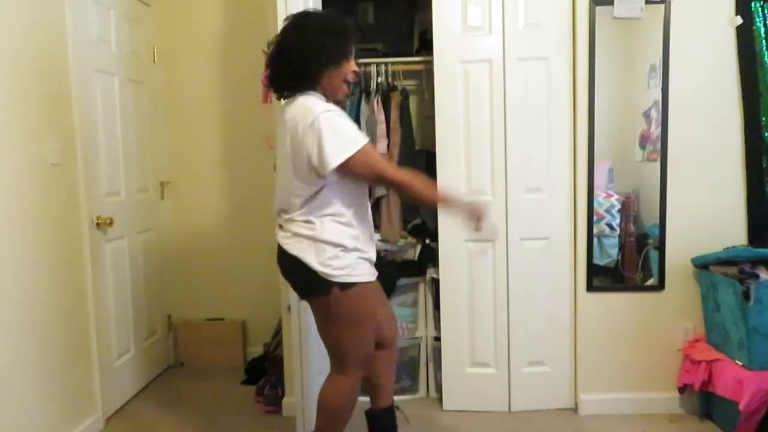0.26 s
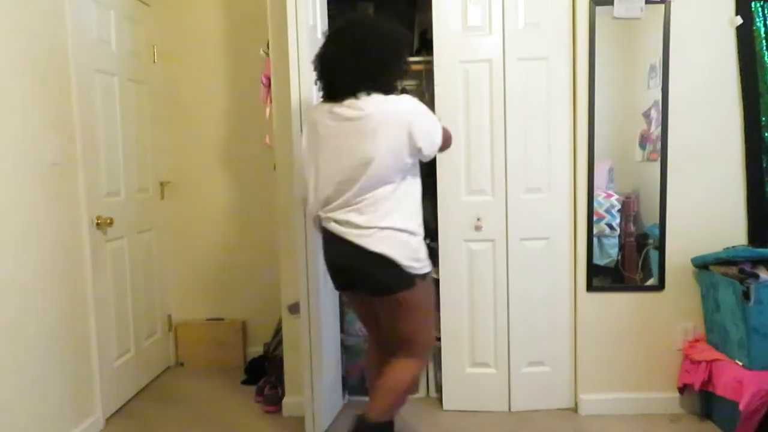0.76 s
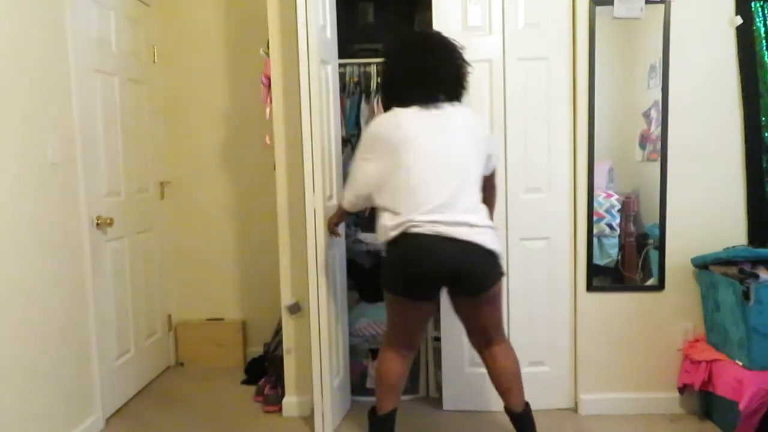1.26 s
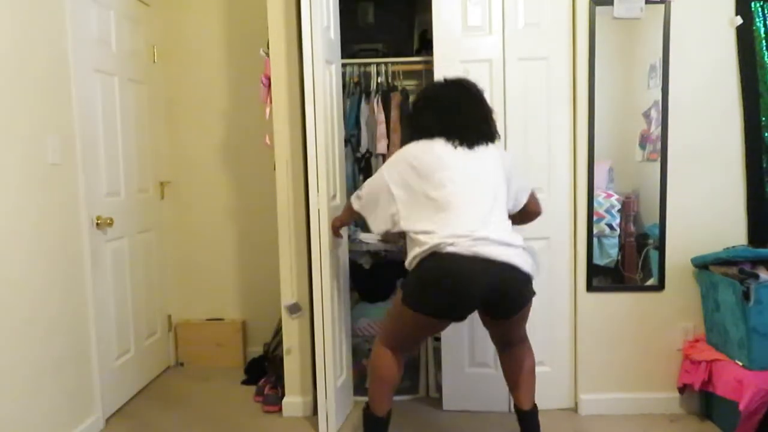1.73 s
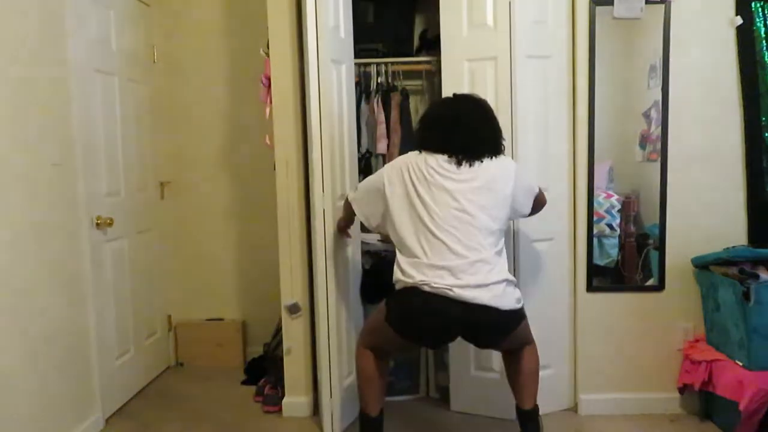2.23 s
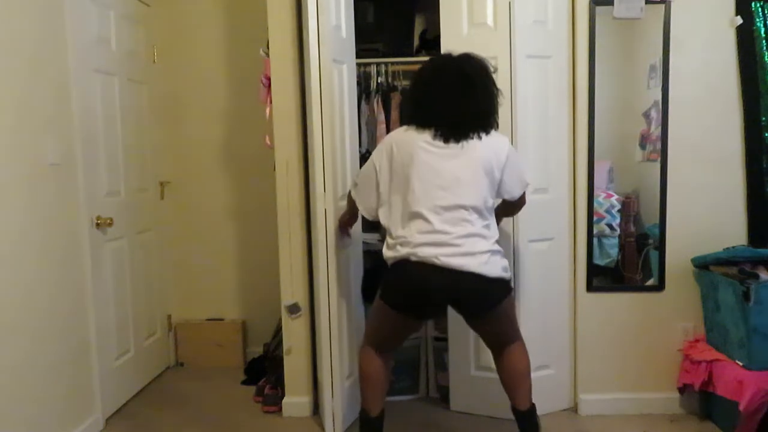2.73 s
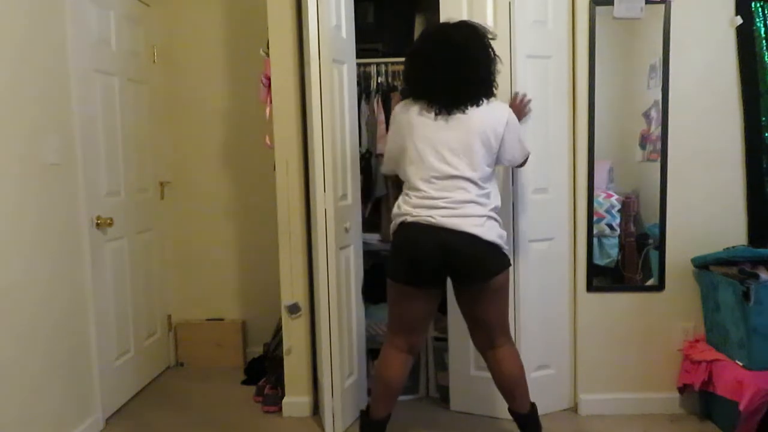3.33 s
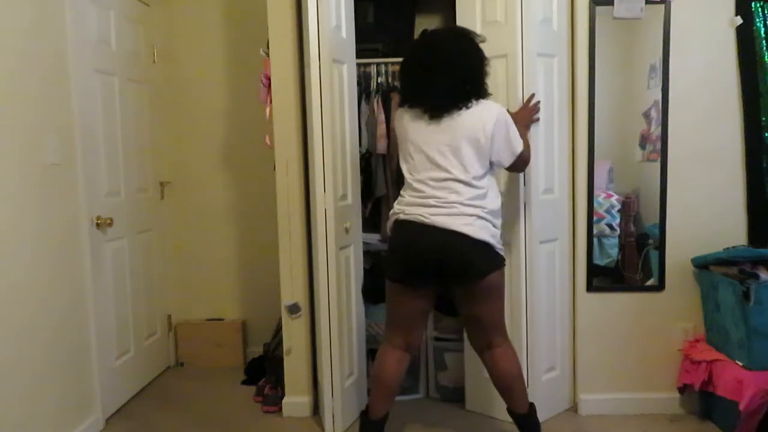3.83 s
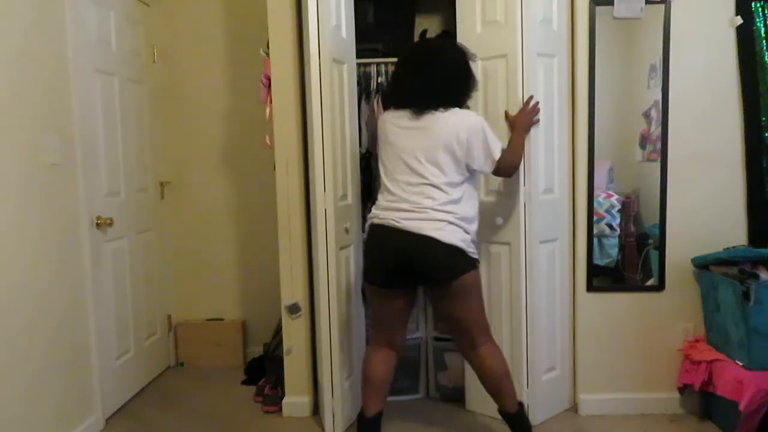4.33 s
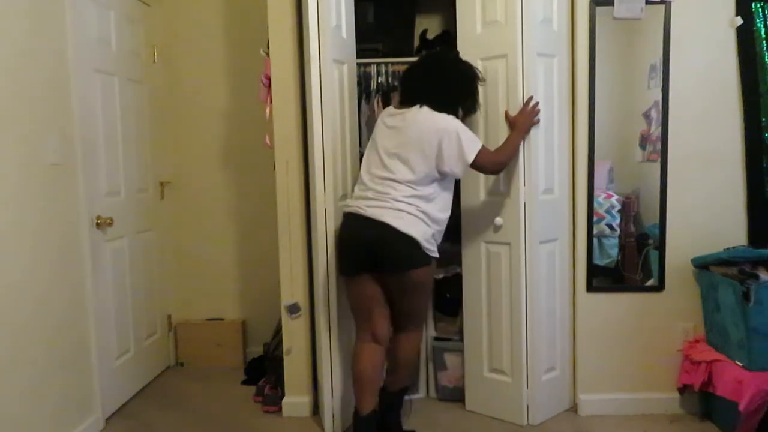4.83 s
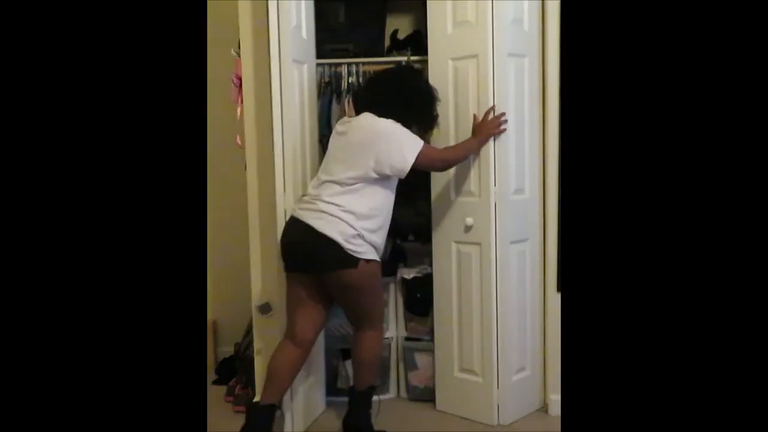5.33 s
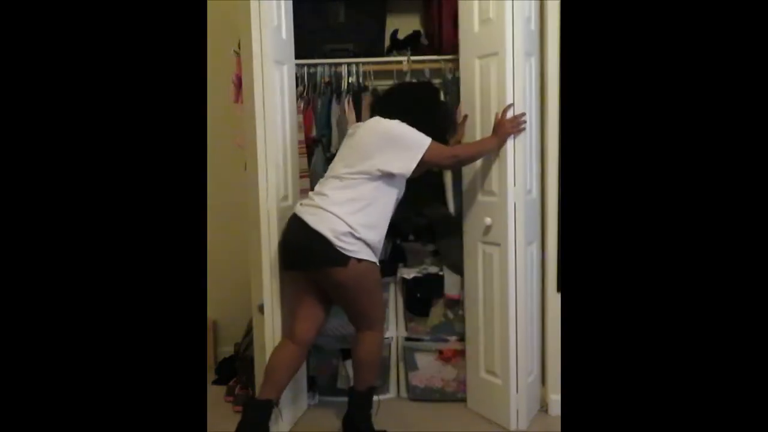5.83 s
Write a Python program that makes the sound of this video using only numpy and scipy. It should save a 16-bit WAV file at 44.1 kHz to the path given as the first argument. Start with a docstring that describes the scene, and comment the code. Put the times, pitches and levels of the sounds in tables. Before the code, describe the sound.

Close, nearly centred sound of light hollow door panels: a single bright crack, a burst of boxy knocks around two seconds, muffled bumping, a rattle near four seconds, small scrapes and faint squeaks, then a loud booming clatter just before six seconds that ends in a creaking drag. Short indoor echo over very faint air.

```python
"""In a carpeted bedroom, hollow folding closet doors are pulled and pushed open.
Knocks and rubs are noisy forces that drive decaying modes of panel, crack and hinge metal; the drag of the guide
pin drives the same modes with clumped slips. Squeaks are gliding narrow noise, thumps are swelling sines, and
the shudder is narrow noise at the two lowest modes. Sparse decaying echoes make the room, over faint steady air."""
import sys
import numpy as np
from scipy import signal
from scipy.fft import rfft, irfft, next_fast_len
from scipy.io import wavfile
from scipy.ndimage import uniform_filter1d

SR = 44100
rng = np.random.default_rng(int(sys.argv[2]) if len(sys.argv) > 2 else 0)


def generate_wav(signal):
    """Clip the signal to [-1, 1] and save it as 16-bit WAV at the path in sys.argv[1]."""
    frames = np.transpose(np.atleast_2d(signal))
    scaled = np.clip(frames, -1, 1) * 32767
    pcm = np.round(scaled).astype(np.int16)
    wavfile.write(sys.argv[1], SR, pcm)


N = 268124

# Modes of the hollow panel. Each row: nominal frequency in Hz, level in dB, t60 in seconds.
PANEL = [(164.5, 0.5, 0.13), (209.3, 1, 0.098), (266, 0, 0.19), (319.8, -4, 0.28), (347.7, -4.5, 0.22),
         (432.4, 3, 0.043), (510, -3.5, 0.1), (551.6, -0.5, 0.12), (694, -8, 0.062)]
# Modes heard as the crack of a blow. Each row: nominal frequency in Hz, level in dB, t60 in seconds.
CRACK = [(800, 4.5, 0.0077), (1132.5, -1, 0.083), (1184, 2, 0.0056), (1625, 0, 0.018), (1706, -3, 0.029),
         (1819, -3, 0.036), (2013, -1.5, 0.0096), (2307, -0.5, 0.027), (2536, 2.5, 0.0049),
         (3340, -1, 0.0099), (3448, -2, 0.014), (3930, -2, 0.0016)]
# Modes of the hinge metal. Each row: nominal frequency in Hz, level in dB, t60 in seconds.
TICK = [(3720, 10, 0.0012), (4614, 5, 0.013), (5300, 2, 0.0058), (6200, -0.5, .02), (7420, -1, 0.0012),
        (9800, -4, 0.001), (12300, -15, 0.0011)]
FAMILIES = PANEL, CRACK, TICK


def gain_of(db):
    """Level: converts decibels to an amplitude factor."""
    return 10 ** (np.asarray(db) / 20)


def evened(x):
    """Normalisation: scales a signal to rms 1."""
    return x / np.sqrt(np.mean(x ** 2) + 1e-20)


def read(points, hz):
    """Spectral interpolation: reads a table on a log-frequency axis."""
    f, value = np.transpose(points)
    return np.interp(np.log(hz + 1), np.log(f + 1), value)


def curve(rows, column):
    """Envelope: turns one dB column of a time table into a gain per sample."""
    rows = np.asarray(rows)
    return gain_of(np.interp(np.arange(N) / SR, rows[:, 0], rows[:, column]))


def coloured(x, points):
    """Linear filtering: weights the spectrum by a table of Hz and dB."""
    size = next_fast_len(N)
    weights = gain_of(read(points, np.fft.rfftfreq(size, 1 / SR)))
    return irfft(rfft(x, size) * weights, size)[..., :N]


def ring(x, modes, shift=1):
    """Modal synthesis: a force excites decaying sines whose summed response has unit energy."""
    t = np.arange(SR // 4) / SR
    body = np.zeros(len(t))
    for k, (hz, db, t60) in enumerate(modes):
        decay = gain_of(db - 60 * t / max(t60, .0008))
        body += (-1) ** k * decay * np.sin(2 * np.pi * hz * shift * t) / np.sqrt(t60)
    return signal.oaconvolve(x, body / np.linalg.norm(body))[:N]


def favour(x, hz, width, rest):
    """Point excitation: a resonance at hz (number or curve) stands out; the rest passes at gain rest."""
    turn = np.exp(2j * np.pi * np.cumsum(hz * np.ones(len(x))) / SR)
    r = np.exp(-np.pi * width / SR)
    # Shift hz down to zero, low-pass, shift back up.
    band = (turn * signal.lfilter([1 - r], [1, -r], x / turn)).real
    return evened(evened(band) + rest * x)


def wooden(x):
    """Contact compliance: wood against wood pushes little above the crack modes."""
    return signal.lfilter(*signal.butter(2, 4500, fs=SR), x)


def contacts(events, shape, focus_hz, rest):
    """Contact excitation: a noisy force of the given shape in time drives three families of modes."""
    detune = .02  # the fold of the door shifts all modes by about this share from contact to contact
    bounce_db, bounce_s = 2.5, .006  # depth and length of the chatter after the first touch
    tick_top_hz, tick_db_per_octave = 12050, 3.5  # top of a tick at -30 dB; softer ticks are duller
    t = np.arange(SR // 3) / SR  # the longest force
    out = np.zeros(N + SR)
    grit = rng.standard_normal((len(events), 4, len(t)))
    shifts = 1 + detune * rng.standard_normal(len(events))
    for event, (low, mid, high, jolt), shift in zip(events, grit, shifts):
        s, db, panel_db, tick_db, length, panel_hz, hz = event
        octaves = (db + tick_db + 30) / tick_db_per_octave
        top_hz = np.clip(tick_top_hz * 2 ** octaves, 5500, 18000)
        high = evened(signal.lfilter(*signal.butter(2, top_hz, fs=SR), high))
        chatter = evened(uniform_filter1d(jolt, round(bounce_s * SR)))
        bounces = evened(gain_of(bounce_db * np.minimum(t / (5 * bounce_s), 1) * chatter))
        panel_noise = favour(low, panel_hz, 0.2 * focus_hz, rest)
        crack_noise = favour(wooden(mid), hz, focus_hz, rest)
        noise = np.array([panel_noise, crack_noise, high])
        levels = gain_of(db + np.array([[panel_db], [0], [tick_db]]))
        forces = levels * shape(t, max(length, .01)) * noise * bounces
        sound = sum(ring(force, modes, shift) for force, modes in zip(forces, FAMILIES))
        out[round(s * SR):][:len(sound)] += sound
    return out[:N]


def hush():
    """Stationary noise: faint steady air of the room, one noise for mid and one for side."""
    # Spectrum of the quiet room. Each row: frequency in Hz, relative level in dB per Hz.
    air_spectrum = [(88, -20.5), (150, -4), (216, -16), (257, -23.5), (312, -28), (1980, -16.5),
                    (5950, -26.5), (15000, -40)]
    return gain_of(-78) * evened(coloured(rng.standard_normal((2, N)), air_spectrum))


def drag():
    """Stick-slip friction: clumped slips of pin and hinges over a smooth rub ring the knocks' modes."""
    # The moving door. Each row: time in seconds, panel rumble in dB, scrape along the track in dB.
    motion = [(0.0, -44.5, -71), (0.29, -44.5, -63), (0.46, -55, -65.5), (1.25, -74.5, -78),
              (1.39, -39.5, -49), (1.78, -61, -62.5), (1.95, -23, -55.5), (2.08, -34.5, -54),
              (2.45, -51.5, -60.5), (2.62, -61.5, -80), (3.0, -68, -81), (3.59, -78, -89.5),
              (3.79, -44.5, -59.5), (3.82, -46, -56.5), (3.91, -25.5, -39.5), (4.13, -80.5, -70.5),
              (4.42, -69, -60.5), (4.54, -58, -57.5), (4.72, -77, -75), (4.98, -75.5, -71.5),
              (5.16, -44.5, -56.5), (5.36, -52.5, -57), (5.53, -31.5, -43), (5.64, -46.5, -48),
              (5.69, -28.5, -34), (5.88, -28.5, -45.5), (5.94, -35.5, -43), (6.03, -42, -36.5),
              (6.08, -41, -36)]
    slips_per_s, spread_db, smooth = 1000, 2.4, 0.6
    clump_db, clump_s, wander = 2.4, .018, .12  # wander: spread of the roaming log-frequency
    scrape_base_hz, scrape_hz_per_db = 1707, 58  # the centre rises as the scrape gains on the rumble
    # Hiss relative to the scrape at hard_db when scrape equals rumble; it grows faster than the scrape.
    hiss_db, hiss_slope, hard_db, hiss_per_db = -13.5, 1.4, -51.5, 0.48

    sizes = gain_of(spread_db * np.minimum(rng.exponential(1, N), 5))
    slips = sizes * (rng.random(N) < slips_per_s / SR)
    rub = smooth * np.array([[1], [2], [6]]) * rng.standard_normal((3, N))
    low, mid, high = evened(slips * rng.choice([-1, 1], N)) + rub

    span = round(clump_s * SR)
    *slow, roam = (evened(uniform_filter1d(uniform_filter1d(row, span), span))
                   for row in rng.standard_normal((5, N)))
    # One shared fluctuation and one of its own for each family of modes.
    clumps = [evened(gain_of(clump_db * evened(slow[0] + own))) for own in slow[1:]]

    rumble, scrape = curve(motion, 1), curve(motion, 2)
    hard = gain_of(hard_db)
    hiss = hard * gain_of(hiss_db) * (scrape / hard) ** hiss_slope * (scrape / rumble) ** hiss_per_db
    centre_hz = scrape_base_hz + scrape_hz_per_db * 20 * np.log10(scrape / rumble)
    scrape_hz = np.clip(centre_hz, 1000, 2600) * np.exp(wander * roam)
    forces = rumble * evened(low), scrape * favour(mid, scrape_hz, 670, 0.97), hiss * evened(high)
    return sum(ring(force * clump, modes) for force, clump, modes in zip(forces, clumps, FAMILIES))


def shudder():
    """Sustained resonance: the hands keep the door's two lowest modes going, as narrow noise around each."""
    # Level of the flex mode. Each row: time in seconds, level in dB.
    flex_level = [(0.0, -55), (0.96, -67.5), (1.73, -52.5), (2.01, -29), (2.23, -42), (2.66, -55.5),
                  (3.23, -60.5), (3.61, -43), (3.76, -39.5), (4.03, -35.5), (4.33, -44), (4.72, -57),
                  (5.08, -61.5), (5.32, -41), (5.88, -37.5), (6.08, -29.5)]
    # Shoves that set the whole door swaying. Each row: time of the peak in seconds, level in dB.
    shoves = [(.37, -46), (.56, -46.5), (1.97, -35.5), (2.099, -31.5), (2.25, -40.5), (3.94, -27.5),
              (4.202, -41), (5.27, -44), (5.45, -40), (5.69, -19.5), (5.86, -27.5), (6.0, -41)]
    rise_db_s, fall_db_s, rest_db = 250, 151.5, -63
    sway_hz, sway_width_hz = 50, 24
    flex_hz, flex_width_hz = 108, 30
    out, t = np.zeros(N), np.arange(N) / SR
    sway = gain_of(rest_db) * np.ones(N)
    for s, db in shoves:
        sway += gain_of(db - np.maximum(rise_db_s * (s - t), fall_db_s * (t - s)))
    modes = (sway, sway_hz, sway_width_hz), (curve(flex_level, 1), flex_hz, flex_width_hz)
    for level, hz, width in modes:
        r = np.exp(-np.pi * width / SR)
        wander = signal.lfilter([1], np.convolve([1, -r], [1, -r]), rng.standard_normal((2, N)))
        z = wander[0] + 1j * wander[1]
        z = z / (abs(z) + 0.034 * np.std(z))  # a steady push evens out the swing
        out += level * evened((z * np.exp(2j * np.pi * hz * t)).real)
    return out


def thumps():
    """Transient flexure: soft thumps of a panel against its stop are low sines that swell and die."""
    # Each row: start in seconds, peak level in dB, frequency in Hz.
    blows = [(0.064, -40, 110.4), (0.499, -38.5, 122), (0.917, -45, 123), (1.792, -28, 134),
             (1.931, -28, 135), (1.999, -24.5, 132), (2.102, -23.5, 132), (2.291, -40.5, 161),
             (2.429, -32.5, 112), (2.84, -35, 115.4), (3.068, -47.5, 107.8), (3.238, -37.5, 103.2),
             (3.317, -43, 107.3), (3.374, -41, 99), (3.448, -41.5, 95), (3.594, -30.5, 115.7),
             (3.64, -29.5, 100), (3.83, -32.5, 104.5), (4.021, -28, 108.4), (4.165, -34, 105.5),
             (4.552, -40, 104.4), (5.1, -35, 119), (5.191, -31.5, 115.3), (5.657, -15, 141.7),
             (5.732, -16.5, 120.4), (5.793, -14.5, 123)]
    thump_s = 0.051  # the swell peaks after a third of this
    out, u = np.zeros(N + SR), np.arange(0, 3, 1 / (thump_s * SR))
    for s, db, hz in blows:
        swell = 3 * u * np.exp(1 - 3 * u)
        swing = swell * np.sin(2 * np.pi * (hz * u * thump_s + rng.random()))
        out[round(s * SR):][:len(u)] += gain_of(db) * swing
    return out[:N]


def rubs():
    """Sliding contact: hand or edge on a panel gives a catch, a held stroke that eases off, a quick release."""
    # Each row: start in seconds, scrape in dB, panel and tick in dB against the scrape,
    # length in seconds (at least 0.01 is used), centre of the panel force in Hz, centre of the scrape in Hz.
    strokes = [(0.108, -64, 19, -32, 0.014, 510, 980), (0.695, -53, 12.5, -27, 0.14, 512, 1050),
               (0.718, -37, 1, -27, 0.11, 498, 1420), (1.519, -29.5, -7, -32, 0.042, 275, 1080),
               (2.59, -40, 8, -56, 0.11, 421, 1353), (2.7, -35.5, -1, -43.5, 0.063, 375, 1055),
               (3.56, -48, -0.5, -40, 0.057, 420, 2000), (3.745, -45, -2.5, -29, 0.27, 479, 2710),
               (4.433, -44, 9.5, -35, 0.036, 596, 1190), (4.506, -47, -5, -11, 0.18, 464, 2190),
               (4.868, -49, -20, -24, 0.09, 517, 1940), (4.987, -47.5, 2.5, -32, 0.11, 462, 1970),
               (5.105, -47.5, -11, -19, 0.043, 443, 910), (5.285, -45.5, 15.5, -17, 0.01, 430, 980),
               (5.337, -39, -6, -45, 0.054, 440, 1230), (5.385, -34.5, -0.5, -23, 0.11, 257, 1370),
               (5.454, -28, -7.5, -14.5, 0.027, 334, 2040)]
    family_gain = gain_of([[-16], [-13], [-9]])  # panel, scrape, tick

    def stroke(t, held):
        """Force envelope: a 5 ms catch, a fall of 4 dB over the hold, then 1100 dB/s more."""
        ease_db = -4.0 * t / held - 1100 * np.maximum(t - held, 0)
        return family_gain * np.minimum(t / 0.005, 1) * gain_of(ease_db)

    return contacts(strokes, stroke, 710, 0.2)


def knocks():
    """Impact: a sharp blow snaps, then bounces die in a rattle; bass builds slower than treble."""
    # Each row: start in seconds, crack in dB, panel and tick in dB against the crack,
    # rattle t60 in seconds, centre of the panel force in Hz, centre of the crack force in Hz.
    blows = [(0.221, -30.5, -6.5, -23.5, 0.29, 358, 2010), (0.948, -45.5, 4.5, -36.5, 0.13, 606, 1010),
             (1.208, -16.5, -4, -7.5, 0.2, 527, 1570), (1.485, -22, -1, -54, 0.12, 356, 1140),
             (1.769, -51.5, 27.5, -29, 0.11, 254, 1305), (1.793, -38, 19.5, -33.5, 0.091, 528, 1130),
             (1.91, -36, 8, -46, 0.27, 484, 1090), (1.962, -25, 4, -45, 0.14, 488, 1050),
             (1.984, -14, 4, -45, 0.15, 275, 1185), (2.078, -16, 9, -67, 0.099, 380, 1085),
             (2.192, -33, -10, -20, 0.13, 460, 2500), (2.308, -37.5, -1.5, -33, 0.26, 560, 1360),
             (2.429, -32, 7, -51, 0.031, 428, 1870), (3.712, -59.5, 20.5, -37, 1, 394, 1860),
             (3.805, -35.5, -1.5, -27, 0.97, 356, 1250), (3.911, -30, 3, -8, 0.18, 520, 2650),
             (4.106, -43.5, 11, -33, 0.056, 416.3, 2030), (4.243, -32, -3, -24, 0.084, 505, 2470),
             (4.33, -43, 1.5, -29, 0.19, 396, 1110), (4.649, -37, -20, -20, 0.061, 434, 2230),
             (4.73, -62.5, 24, -20, 0.049, 490, 1600), (5.202, -39, 4.5, -40, 0.07, 303, 1870),
             (5.225, -47, 15.5, -42, 0.082, 440, 1140), (5.375, -43, 12, -19, 0.1, 406, 2010),
             (5.581, -34.5, 8, -22, 0.096, 458, 2880), (5.656, -16.5, -3.5, -10, 0.24, 410, 3000),
             (5.69, -21.5, -7, -26, 0.11, 550, 840), (5.761, -24.5, -4.5, -10, 0.16, 234, 1810),
             (5.797, -21, 5, -26, 0.098, 241, 1340)]
    # Rows of each setting: panel, crack, tick.
    rise_s = np.array([[.006], [.003], [.0007]])
    family_gain = gain_of([[-12], [-9.5], [-3]])
    snap = np.array([[0], [.3], [.8]])

    def blow(t, t60):
        """Force envelope: a linear rise times a decaying rattle plus a snap with a t60 of 38 ms."""
        decay = gain_of(-60 * t / t60) + snap * gain_of(-60 * t / 0.038)
        return family_gain * np.minimum(t / rise_s, 1) * decay

    return contacts(blows, blow, 800, 0.15)


def pin_tick():
    """Impulsive excitation: a thin tick of the guide pin, a decaying noise burst ringing high modes."""
    s, db, hz, t60 = 1.618, -54, 9500, .06  # start in s, dB, Hz, t60 of the burst in s
    t = np.arange(N) / SR - s
    burst = gain_of(db - 60 * np.maximum(t, 0) / t60) * (t > 0) * rng.standard_normal(N)
    return ring(burst, [(hz, 0, .002), (.75 * hz, -6, .002), (1.3 * hz, -6, .002)])


def squeaks():
    """Frictional oscillation: narrow, breathy tones glide while pin or hinge binds and lets go."""
    # Each row: start in seconds, level in dB, length in seconds, start and end frequency in Hz.
    tones = [(1.905, -26.5, 0.024, 1047, 1123), (4.434, -43.5, 0.04, 1234, 1160),
             (4.452, -35, 0.036, 590, 545), (4.868, -52, 0.038, 1720, 1730), (4.87, -55, 0.044, 2320, 2230),
             (5.455, -33.5, 0.042, 2400, 2100), (5.896, -31, 0.15, 657, 668),
             (5.94, -36, 0.077, 1184, 1180), (6.016, -36.5, 0.04, 2220, 2360)]
    width_share, rise_share = .07, 0.086  # of the start pitch, of the length
    out, grit = np.zeros(N + SR), rng.standard_normal((len(tones), SR // 4))
    for (s, db, length, start_hz, end_hz), noise in zip(tones, grit):
        u = np.minimum(np.arange(len(noise)) / (max(length, .02) * SR), 1)
        hz = start_hz + (end_hz - start_hz) * u
        width = width_share * start_hz
        tone = favour(favour(noise, hz, width, 0), hz, width, 0)
        envelope = np.minimum(u / rise_share, 1) * np.sqrt(1 - u)
        out[round(s * SR):][:len(u)] += gain_of(db) * envelope * tone
    return out[:N]


def room(x):
    """Reverberation: two unrelated tails of sparse echoes, each band dying at its own speed."""
    # Each row: frequency in Hz, t60 in seconds.
    band_t60 = [(100, 0.11), (500, 0.54), (2000, 0.51), (5000, 0.36), (12000, 0.13)]
    taps = np.zeros((2, SR))
    at = np.arange(200, SR - 20, 20) + rng.integers(0, 20, (2, (SR - 201) // 20))
    np.put_along_axis(taps, at, rng.choice([-1., 1.], at.shape), 1)
    hz, t, z = signal.stft(taps, SR, nperseg=256)
    decay = gain_of(-60 * t / read(band_t60, hz)[:, None])
    tails = signal.istft(z * decay, SR, nperseg=256)[1]
    return signal.fftconvolve(x[None], tails / np.linalg.norm(tails[0]), axes=1)[:, :N]


def scene():
    """Spatial coherence: two close microphone ports differ by diffuse sound, more so in the treble."""
    # Filter on the diffuse side sound. Each row: frequency in Hz, side against mid in dB.
    side_spectrum = [(30, -40), (60, -48), (125, -34), (250, -29), (500, -20), (1000, -24), (2000, -23),
                     (4000, -10), (8000, -6), (14000, 5)]
    # Balance of the ports. Each row: frequency in Hz, left over right in dB.
    balance = [(80, 0), (250, .7), (550, 1.9), (900, -.1), (3000, .1)]
    door = knocks() + rubs() + drag() + squeaks() + pin_tick()
    (near, other), (air, other_air) = room(door), hush()
    room_db = -11
    mid = door + gain_of(room_db) * near + shudder() + thumps() + air
    side = coloured(other + other_air, side_spectrum)
    left_lean = [(hz, db / 2) for hz, db in balance]
    right_lean = [(hz, -db) for hz, db in left_lean]
    return np.array([coloured(mid, left_lean) + side, coloured(mid, right_lean) - side])


def record(dry):
    """Gating and band limitation: the level dips briefly by 40 dB, then a low-pass removes the top."""
    dip_start_s, dip_end_s, edge_hz = 5.0745, 5.096, 15000
    t = np.arange(N) / SR
    fall, rise = (dip_start_s - t) / 0.0002, (t - dip_end_s) / 0.0036
    on = np.clip(np.maximum(fall, rise), .01, 1)
    low_pass = signal.firwin(511, edge_hz, window=("kaiser", 9), fs=SR)
    return signal.oaconvolve(dry * on, low_pass[None], "same")


dry = scene()
out = record(dry)
generate_wav(out)
```